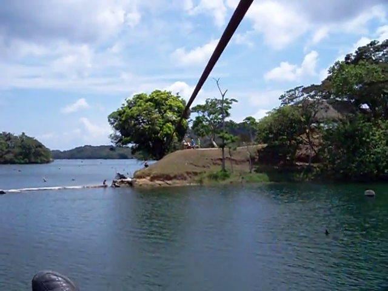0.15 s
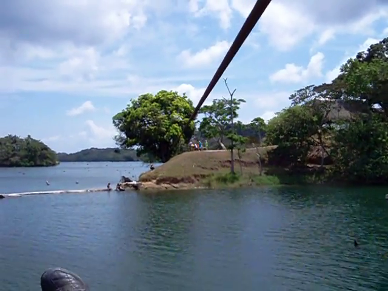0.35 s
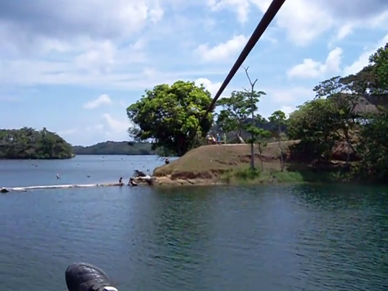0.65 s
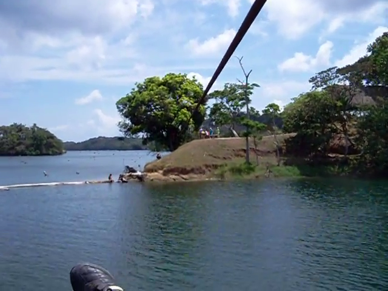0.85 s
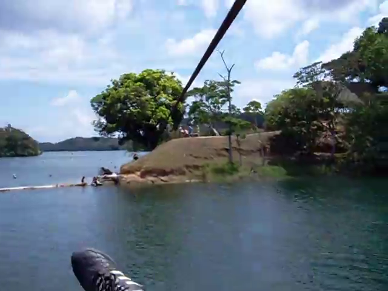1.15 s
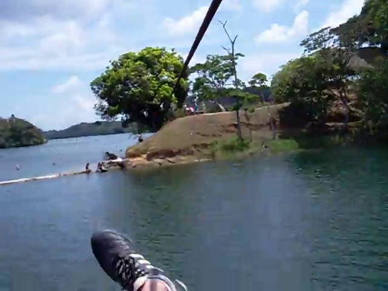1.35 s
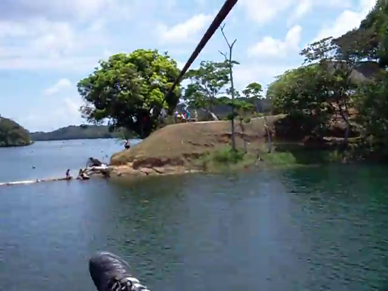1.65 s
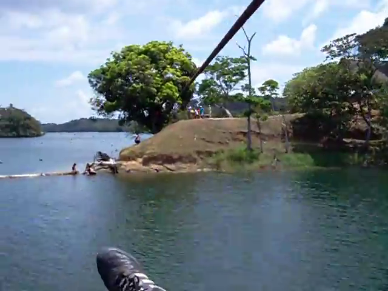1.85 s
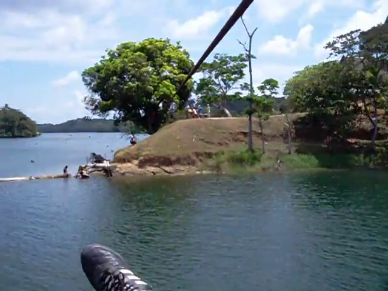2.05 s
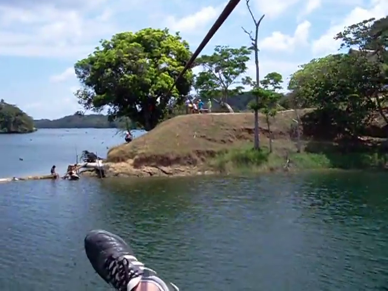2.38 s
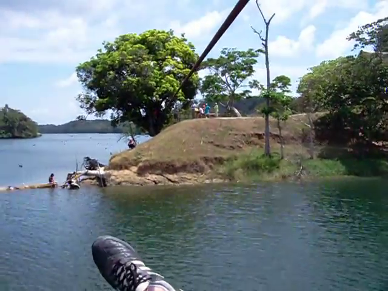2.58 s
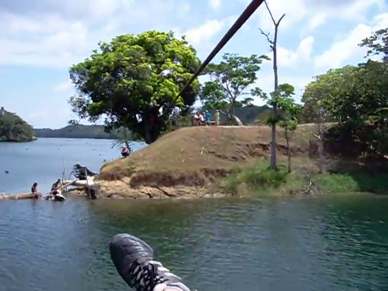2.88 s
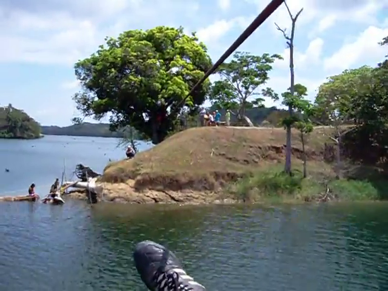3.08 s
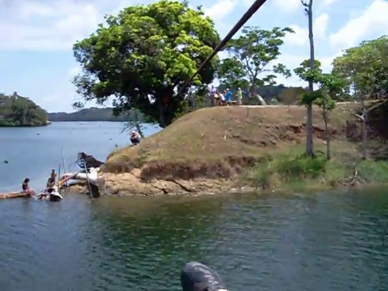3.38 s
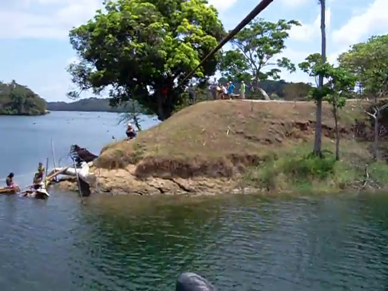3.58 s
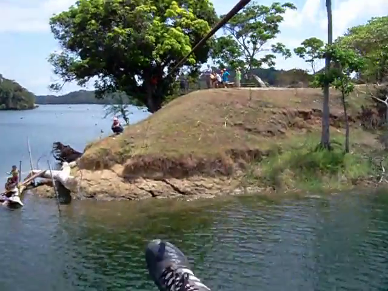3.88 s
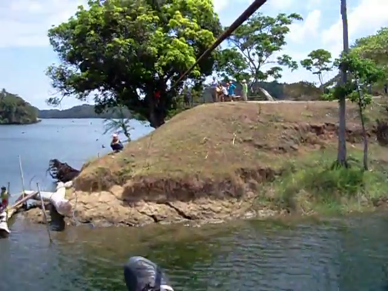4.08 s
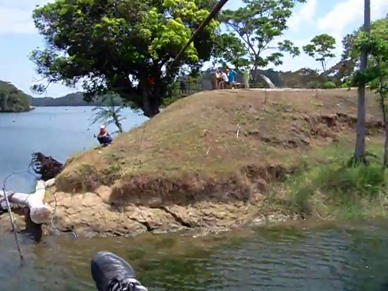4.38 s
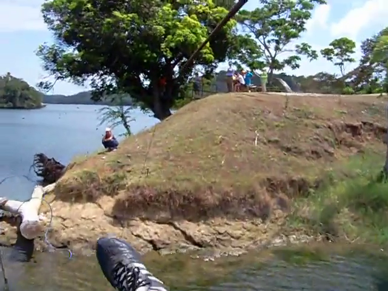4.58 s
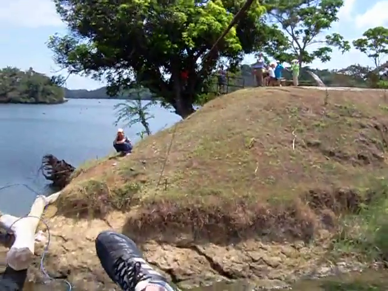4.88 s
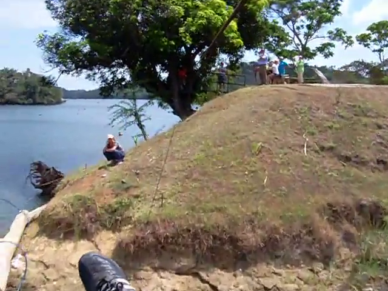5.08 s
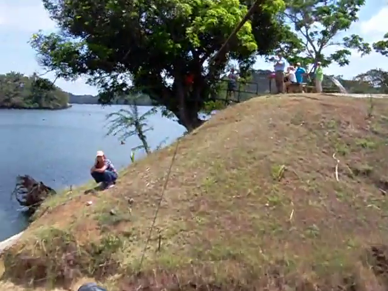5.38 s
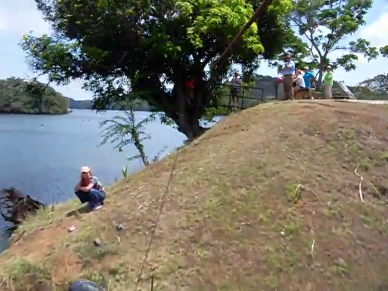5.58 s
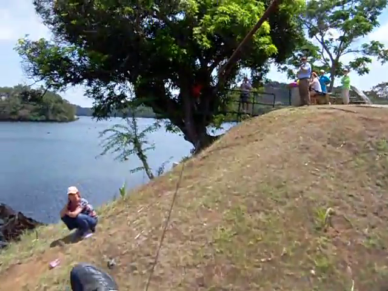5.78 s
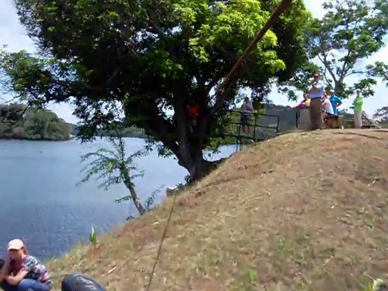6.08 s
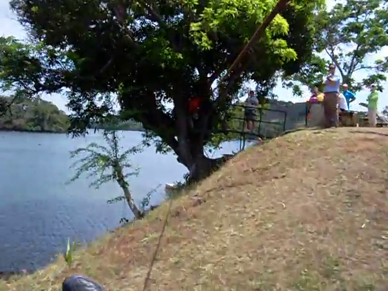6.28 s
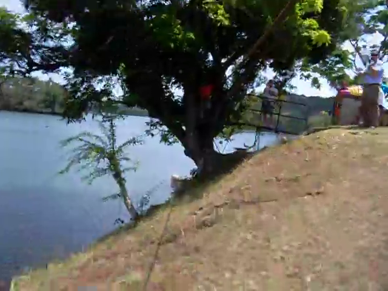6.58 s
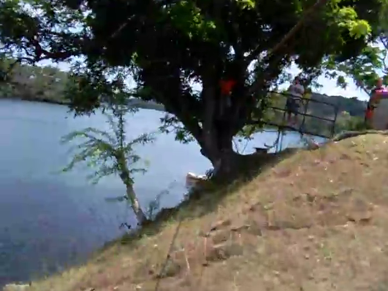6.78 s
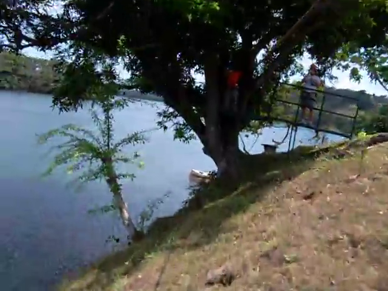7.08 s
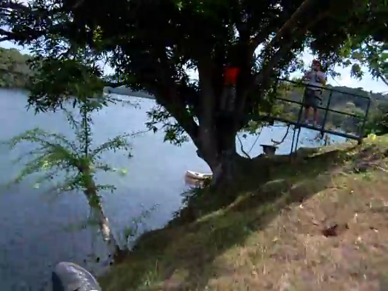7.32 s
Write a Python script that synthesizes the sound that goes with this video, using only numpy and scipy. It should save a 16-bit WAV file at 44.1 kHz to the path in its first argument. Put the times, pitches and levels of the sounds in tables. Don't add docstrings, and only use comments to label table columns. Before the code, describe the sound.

Harsh metallic whine of a trolley wheel running on wire, gradually slowing to a chopped buzz as heavy wind thumps fade.

```python
import sys
import numpy as np
from scipy import signal
from scipy.fft import rfft, irfft, next_fast_len
from scipy.io import wavfile
from scipy.ndimage import uniform_filter1d

SR = 44100
rng = np.random.default_rng(int(sys.argv[2]) if len(sys.argv) > 2 else 0)


def elevation(decibels):
    levels = np.asarray(decibels, float)
    return 10 ** (levels / 20)


def int16_out(signal):
    q = np.round(np.clip(np.atleast_2d(signal).T, -1, 1) * 32767)
    wavfile.write(sys.argv[1], SR, q.astype(np.int16))


N = 328545


# (time [s], strands passing the wheel [Hz])
STRAND_RATE = [(0, 584), (.5, 570), (1.24, 542), (2.5, 494), (3.4, 460), (4.6, 409), (5.0, 392), (5.6, 364),
               (6.1, 344), (6.45, 334), (6.75, 311), (7.0, 288), (7.2, 279), (7.45, 269)]
# (time [s], load [dB], lean [0-1])
RIDE = [(0, 1, 0.8), (.2, 1, 1), (.9, 1, 0.87), (1.3, 1.5, .8), (2.0, 1, 0.65), (2.6, 1.5, 0.81),
        (3.05, -2, 0.4), (3.3, 1.5, 0.2), (3.8, -1, 0.3), (4.4, 0.5, 0.5), (4.9, -2, .4), (5.25, 0.5, .5),
        (5.9, -1, 0.59), (6.35, 0.5, 0.7), (6.6, -2.5, .7), (6.75, 0.5, .65), (7.2, -1, 0.7),
        (7.45, -2, 0.7)]
STRANDS_PER_TURN = 8.12


def trolley():
    strand_hz, = curves(STRAND_RATE)
    load_db, lean = curves(RIDE)
    drop = step(6.66, 0.1)
    strand = 2 * np.pi * np.cumsum(strand_hz * (1 + 0.005 * walk(20))) / SR
    turn = strand / STRANDS_PER_TURN
    press = contact(turn)

    main_db = -24.5 + load_db
    high_db = -27 + 18 * (lean - 1)
    low_db = -35 + 0.16 * load_db
    grit = press * (1 + 0.81 * drop * np.cos(strand)) * rng.standard_normal(N)
    body = pulley((main_db, high_db, low_db), grit, turn, 0.35 * drop, drop)
    hiss = contact_hiss(press, load_db, drop)

    chop = 0.05 + 0.1 * drop
    turns_to_jolt = -turn / (2 * np.pi) % 1
    lift = elevation(-4 * np.exp(-turns_to_jolt / 0.12))
    return lift * (1 + chop * np.cos(strand)) * (body + hiss) + strand_hum(strand)


# (frequency [Hz], family [0 main, 1 high, 2 low], sign at the microphone [+1 or -1])
MODES = [(1662, 2, 1), (2178, 2, 1), (3410, 2, -1), (4190, 2, 1), (4258, 0, 1), (4420, 0, 1), (5330, 0, -1),
         (5410, 1, -1), (5760, 0, 1), (6058, 1, -1), (6770, 0, -1), (7495, 1, 1)]
# (width [Hz], level [dB], throb depth [0-1], gain once the wheel drops [dB])
MODE_RING = [(25, -12.5, 0, 3), (44.6, 1, 0.3, 7), (89.5, 6.5, 0.3, 3.5), (89.5, -2.5, 0, 11.5),
             (76, 2, 0.56, 3), (118, -23, 0.96, 10.5), (220, -14.5, 0.4, 2.5), (97, 1, 0.1, 0),
             (50, -11.5, 0.4, 4.5), (55, 3.5, 0.55, -1), (50, -27, 0.02, 6.5), (78, -7, 0.5, 0)]


def pulley(family_db, grit, turn, steady, drop):
    out = 0
    for (hz, family, sign), (width, db, depth, drop_db) in zip(MODES, MODE_RING):
        out_of_step = 0.76 * rng.standard_normal() + 0.5 * walk(2.7)
        throb = 1 + depth * (1 - steady) * np.cos(turn - 1.2 + out_of_step)
        level_db = db + family_db[family] + drop_db * drop + walk(9)
        out = out + sign * elevation(level_db) * throb * unit(ring(grit, hz, width))
    return out


def contact(turn):
    turns_since_jolt = turn / (2 * np.pi) % 1
    jolt = 1 + 0.49 * np.exp(-turns_since_jolt / 0.1)
    flicker_db = 0.44 * walk(70) + 0.9 * walk(10) + 1.37 * walk(300)
    return unit(jolt * elevation(flicker_db))


# (frequency [Hz], level [dB per Hz])
HISS_SPECTRUM = [(300, -0.5), (800, 3.5), (1300, 6.5), (2020, 7.5), (2350, 10.5), (3000, 11.5), (4000, -1),
                 (5500, 7), (7000, 9.5), (7700, 5), (8100, 3.5)]


def contact_hiss(press, load_db, drop):
    return elevation(-27 + 0.8 * load_db - drop) * press * colour(HISS_SPECTRUM)


HUM_SPELLS = {1: [(-1, .55, -48), (.55, 4.35, -55), (4.35, 5.55, -47), (5.55, 6.64, -44), (6.64, 9, -51)],
              2: [(4, 6.66, -58), (6.66, 7.0, -43.5), (7.0, 7.25, -47)], 4: [(7.1, 9, -49.5)]}


def strand_hum(strand):
    fade = 0.06
    hum = 0
    for multiple, spells in HUM_SPELLS.items():
        for start, end, db in spells:
            spell = step(start, fade) - step(end, fade)
            hum = hum + elevation(db) * spell * np.sin(multiple * strand)
    return np.sqrt(2) * elevation(1.6 * walk(12)) * hum


# (time [s], length [s], depth [dB])
DIPS = [(.045, .006, -9), (.764, .006, -8), (3.205, .006, -8), (3.254, .007, -11), (3.275, .005, -8),
        (3.499, .006, -9), (3.722, .009, -13), (3.739, .006, -10), (4.055, .006, -8), (4.52, .008, -11),
        (4.696, .006, -8), (4.792, .007, -9), (4.851, .006, -8), (6.527, .007, -8), (6.578, .008, -8),
        (6.626, .007, -8), (6.866, .006, -8)]


def dips():
    t = np.arange(N) / SR
    gain_db = 0
    for s, length, db in DIPS:
        late = (t - s) / length - 0.4
        gain_db = gain_db + db * np.exp(-np.where(late < 0, late / 0.95, late * 8) ** 2)
    return elevation(gain_db)


# (time [s], strength [dB], how squarely the port faces it [0-1])
AIR = [(0, -30, .6), (.64, -27.5, .6), (.75, -23.5, 0.44), (1.5, -23.5, 0.41), (2.0, -28, 0.2),
       (2.15, -32.5, 0.4), (3.17, -28.5, 0.19), (3.23, -27, 0.94), (4.4, -29, 0.73), (4.55, -33, 0.84),
       (5.5, -34, 0.44), (6.0, -37, 0.33), (6.6, -42, 0.55), (6.9, -45.5, 0.53), (7.45, -45, 0.6)]
# (peak time [s], length [s], rise [dB], facing added [0-1])
GUSTS = [(.09, .06, 2, .2), (.71, 0.09, 2.5, 0.2), (0.937, 0.13, 3, 0), (1.138, 0.068, 3.5, 0.3),
         (1.399, 0.06, 4.5, 0), (1.657, 0.27, 3, 0), (1.87, 0.18, 3.5, 0.3), (2.052, 0.067, 2, .1),
         (2.275, 0.049, 9.5, .1), (2.468, 0.077, 11, .1), (2.716, 0.21, 7, 0), (2.976, 0.067, 8.5, 0),
         (3.126, .07, -1.5, 0.3), (3.277, .06, 7, .4), (3.395, 0.071, 7.5, .1), (3.548, 0.13, 7, 0),
         (3.883, 0.064, 7, .4), (4.016, 0.11, 5.5, .1), (4.148, .06, 3, .4), (4.317, .05, 5, .1),
         (4.396, 0.034, 5, 0.5), (4.659, 0.16, -0.5, .1), (4.877, 0.068, 1, 0.3), (5.11, 0.073, 3, 0.02),
         (5.348, 0.094, 0, .1), (5.523, .07, 4.5, .2), (5.82, 0.17, 4, 0), (6.35, 0.036, 0, .1),
         (7.035, 0.048, 10.5, 0), (7.383, .12, 8, 0)]


def airflow():
    t = np.arange(N) / SR
    flow_db, facing = curves(AIR)
    for s, length, db, facing_added in GUSTS:
        swell = np.exp(-((t - s) / length * 2) ** 2)
        flow_db = flow_db + db * swell
        facing = facing + facing_added * swell
    return flow_db, facing


# (frequency [Hz], level [dB per Hz])
BUFFET = [(12, 1.5), (25, -4.5), (60, -2.5), (90, -16), (140, -23.5)]
RUMBLE = [(45, -26.5), (80, 6), (130, 2), (200, -2.5), (320, -18), (500, -35)]
FLUTTER = [(120, -8.5), (250, -2), (500, -6), (1000, -12.5), (2000, -28)]


def wind():
    flow_db, facing = airflow()
    puffs = walk(34)
    buffet_db = 0.52 * (flow_db + 31.5) - 24.5 + 8.5 * facing + 0.95 * puffs
    buffet = elevation(buffet_db) * np.tanh(0.38 * colour(BUFFET))
    rumble_db = flow_db - 5.5 * facing + 1.1 + 2.4 * puffs
    rumble = elevation(rumble_db) * colour(RUMBLE)
    flutter_db = 0.56 * (flow_db + 30) - 41.5 + 8.5 * facing + 0.47 * puffs + 2.04 * walk(45)
    flutter = elevation(flutter_db) * colour(FLUTTER)
    air = buffet + rumble + flutter
    slow = signal.sosfiltfilt(signal.butter(2, 110, fs=SR, output="sos"), air)
    shelter = 0.55 * (1 - step(1.0, 0.3))
    return air - shelter * slow


def curves(table):
    s, *columns = np.transpose(table)
    return [np.interp(np.arange(N) / SR, s, c) for c in columns]


def step(s, rise):
    return 0.5 + 0.5 * np.tanh((np.arange(N) / SR - s) / rise * 2)


def unit(x):
    return x / np.sqrt(np.mean(x ** 2))


def colour(points):
    hz, db = np.transpose(points)
    size = next_fast_len(N)
    f = np.maximum(np.arange(size // 2 + 1) * SR / size, 1)
    gain = elevation(np.interp(np.log(f), np.log(hz), db, left=-90, right=-90))
    return unit(irfft(rfft(rng.standard_normal(size)) * gain, size)[:N])


def walk(rate):
    k = int(SR / rate)
    held = np.repeat(rng.standard_normal(N // k + 1), k)
    return unit(uniform_filter1d(uniform_filter1d(held, k), k)[:N])


def ring(x, hz, width):
    return signal.lfilter(*signal.iirpeak(hz, hz / width, SR), x)


def scene():
    tremble = elevation(0.41 * walk(40))
    return (dips() * tremble * (trolley() + wind()))[None]


def band_limit(x):
    return signal.sosfilt(signal.butter(12, 8940, fs=SR, output="sos"), x)


CAMERA_RATIO = (160, 441)


def record(dry):
    up, down = CAMERA_RATIO
    ceiling, knee = 0.2, 10
    x = dry * elevation(0.5) / ceiling
    x = ceiling * x / (1 + np.abs(x) ** knee) ** (1 / knee)
    x = signal.resample_poly(x, up, down, axis=1)
    smooth = signal.firwin(32 * down + 1, 8000, window=("kaiser", 8.5), fs=SR * up)
    x = signal.resample_poly(x, down, up, axis=1, window=smooth)[:, :N]
    return band_limit(x)


dry = scene()
out = record(dry)
int16_out(out)
```